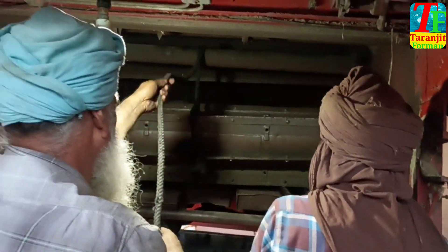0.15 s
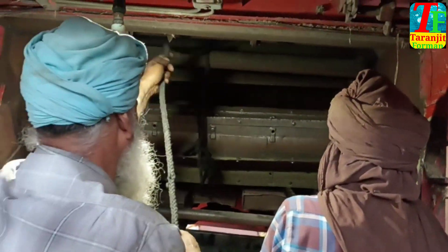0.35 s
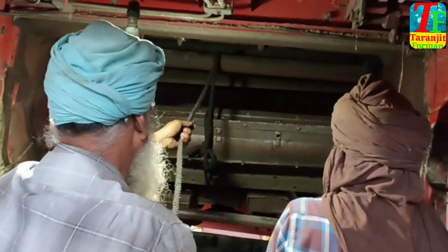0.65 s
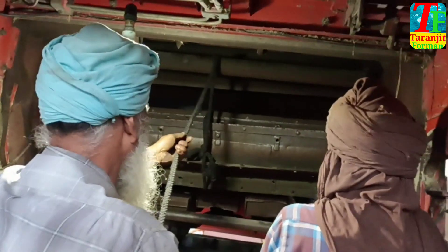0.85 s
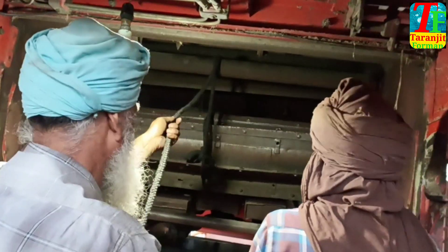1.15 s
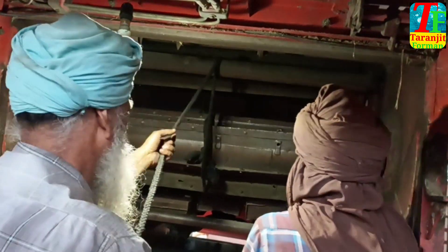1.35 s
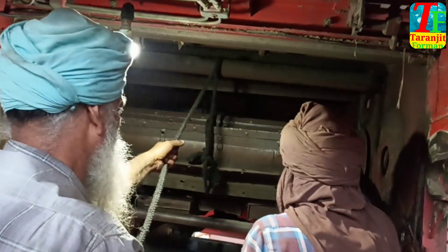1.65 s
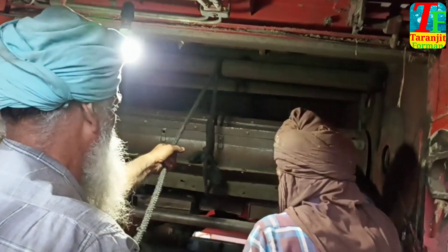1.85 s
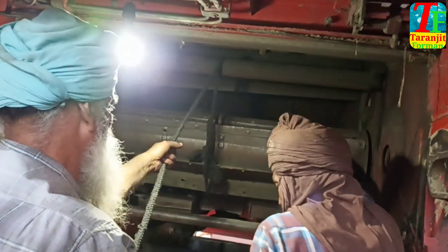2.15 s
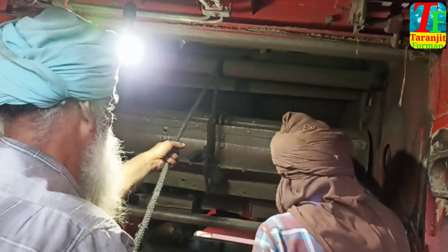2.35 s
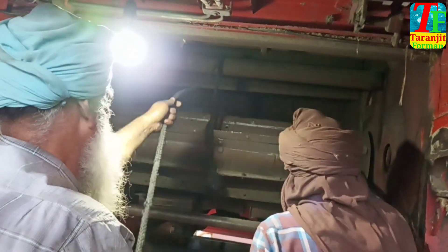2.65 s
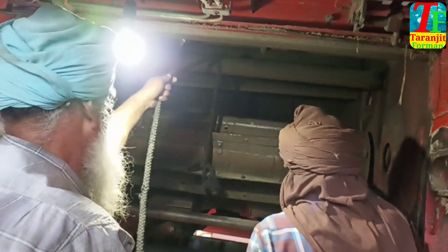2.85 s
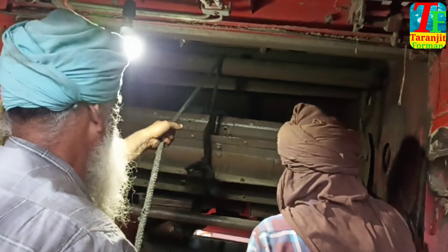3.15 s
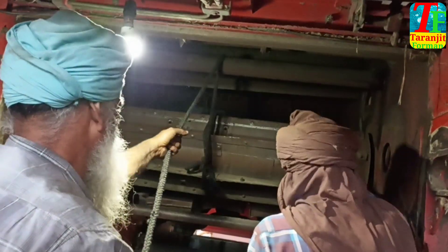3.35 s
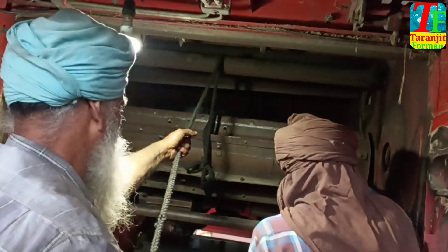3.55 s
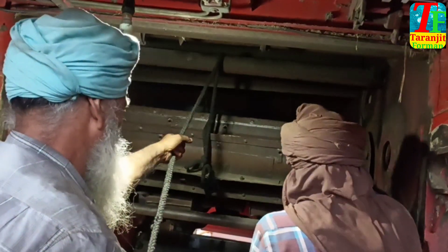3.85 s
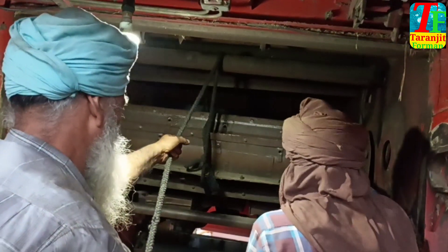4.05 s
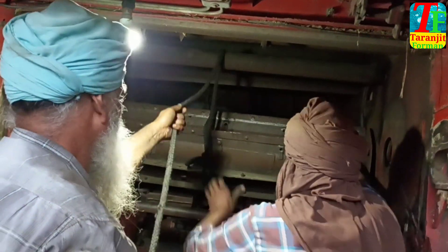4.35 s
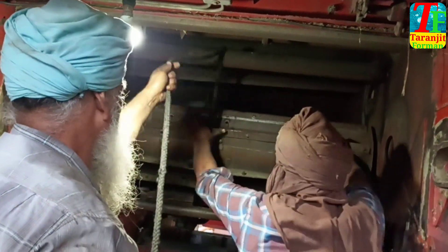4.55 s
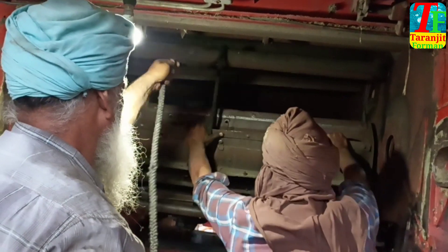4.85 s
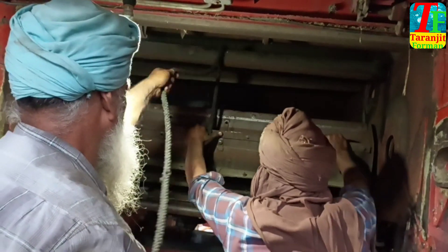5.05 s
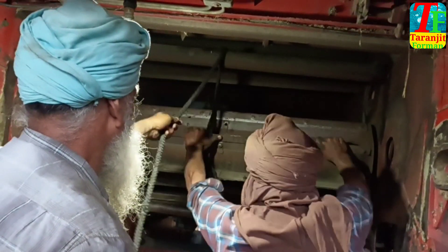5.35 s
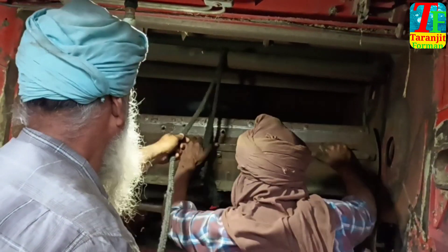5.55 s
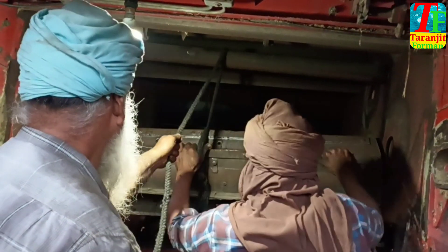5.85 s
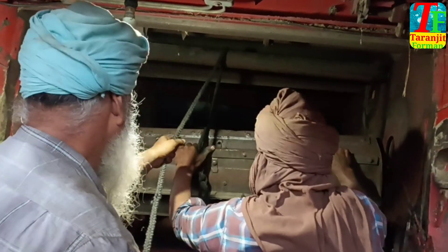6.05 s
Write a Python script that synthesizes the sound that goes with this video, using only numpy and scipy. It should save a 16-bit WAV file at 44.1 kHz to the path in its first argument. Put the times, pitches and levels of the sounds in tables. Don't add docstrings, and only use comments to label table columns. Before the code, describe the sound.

Inside a sheet-metal housing in a quiet workshop, faint ticks and a tiny far bird chirp precede a rough steel squeal with strap scraping. After a lull come a rattling double knock and a smaller clank, then a shriek running into the hardest knock. Finally a loud shriek, thud and bright jangle seat the drum, booming on. Close stereo microphone, panels ringing.

```python
import sys
import numpy as np
from scipy import signal
from scipy.fft import rfft, irfft, next_fast_len
from scipy.io import wavfile
from scipy.ndimage import uniform_filter1d

SR = 44100
rng = np.random.default_rng(int(sys.argv[2]) if len(sys.argv) > 2 else 0)


def put_to_file(sound):
    columns = np.atleast_2d(sound).T
    safe = np.clip(columns, -1, 1)
    whole_steps = np.round(safe * 32767)
    wavfile.write(sys.argv[1], SR, whole_steps.astype(np.int16))


def volts_from_decibels(level):
    exponent = np.asarray(level, float) / 20
    return 10 ** exponent


N = 272823
RIGHT_LAG_SAMPLES = 4

# f/Hz, correlation
LIKENESS = [(60, 0.93), (130, 0.98), (290, 0.92), (640, 0.67), (1410, 0.077), (3100, 0.034), (6820, 0.034),
            (15000, 0.01)]
# f/Hz, t60/s
PANEL_T60 = [(80, 3.4), (300, 1.11), (560, 1.08), (850, 0.5), (1500, 0.74), (2200, 0.57), (3900, 0.59),
             (10000, 0.21)]


def evened(x):
    return x / np.sqrt(np.mean(x ** 2) + 1e-20)


def read(points, hz):
    f, value = np.transpose(points)
    return np.interp(np.log(hz + 1), np.log(f + 1), value)


def colour(x, points):
    length = x.shape[-1]
    size = next_fast_len(length)
    gain = volts_from_decibels(read(points, np.fft.rfftfreq(size, 1 / SR)))
    return irfft(rfft(x, size) * gain, size)[..., :length]


def pair(size):
    whole = next_fast_len(size)
    a, b = rfft(rng.standard_normal((2, whole)))
    same = np.clip(read(LIKENESS, np.fft.rfftfreq(whole, 1 / SR)), -1, 1)
    return irfft([a, same * a + np.sqrt(1 - same ** 2) * b], whole)[:, :size]


def add(mix, start_s, sound):
    part = mix[..., round(start_s * SR):][..., :sound.shape[-1]]
    part += sound[..., :part.shape[-1]]


def wander(size, span):
    once = uniform_filter1d(rng.standard_normal(size), span)
    return evened(uniform_filter1d(once, span))


def swell(t, start_s, rise_s, hold_s, db, fall_db_s):
    up = np.sin(np.pi / 2 * np.clip((t - start_s) / max(rise_s, .002), 0, 1)) ** 4
    falling_s = np.maximum(t - start_s - rise_s - hold_s, 0)
    return up * volts_from_decibels(2 * (db - fall_db_s * falling_s))


def squeal(start_s, hold_s, force_db, rate_hz, rough, tops, tilt_db_oct, fall_db_s):
    bite, bite_s = 0.0381, .012
    rise_s, dulling_db_s = 0.016, 50.5
    t = np.arange(0, min(hold_s + 48 / fall_db_s, .36), 1 / SR)
    rough = np.clip(rough, 0, 1)
    hz = rate_hz * (1 + bite * np.exp(-t / bite_s))
    waver = .055 * wander(16384, 45) + .03 * wander(16384, 300)
    turns = np.cumsum(hz * (1 + rough * waver[:len(t)])) / SR

    order = np.arange(1, int(15600 / hz.max()) + 1)[:, None]
    level_db = read(tops, order * rate_hz) - read(tops, rate_hz)
    level = volts_from_decibels(level_db + (tilt_db_oct - dulling_db_s * t) * np.log2(order))
    phase = 0.29 * rng.random((64, 1))[:len(order)]
    slips = (level * np.cos(2 * np.pi * (order * turns + phase))).sum(0)
    slips = slips / np.sqrt((level ** 2).sum(0) / 2)

    chatter = volts_from_decibels(3 * rough * wander(16384, 70)[:len(t)])
    force = np.sqrt(swell(t, 0, rise_s, hold_s, force_db, fall_db_s))
    return start_s, force * slips * chatter


def slipping():
    # start t/s, hold t/s, force level/dB, slip rate f/Hz, roughness 0-1
    squeal_rows = [
        (2.161, 0.053, -19.5, 789, 0.99),
        (2.224, 0.057, -20, 834.3, 1.02),
        (2.158, 0.029, -19, 435, 0.5),
        (2.2, 0.099, -27.5, 424.3, .45),
    ]
    opener = (2.053, 0.022, -11, 780, 0.2)
    closer = (2.378, .045, -16.5, 419, .27)
    moan_rows = [(2.03, 0.008, -31, 880, 0.6), (2.33, 0.043, -30.5, 880, 0.55),
                 (2.098, 0.012, -24, 779.5, 0.35), (5.588, 0.024, -34, 932, 0.5),
                 (2.43, 0.015, -18, 403, 0.7), (2.48, 0.042, -20, 410, 0.6), (2.56, 0.019, -29, 420, 0.8),
                 (2.6, 0.0361, -47, 490, 0.56), (5.369, 0.015, -43, 3805, 0.22),
                 (4.77, 0.03, -26.5, 3720, .75), (4.815, 0.02, -27, 3690, 0.8),
                 (4.86, 0.01, -34, 3660, 0.7), (2.392, 0.04, -25.5, 1252, 0.25)]
    shriek_rows = [
        (4.728, 0.018, -20, 3700, 0.5),
        (5.592, 0.012, -18, 2960, 0.6),
        (5.612, 0.013, -12.5, 2780, .7),
        (5.635, 0.01, -18, 2720, 0.75),
        (5.615, .022, -19, 3130, .65),
    ]
    # f/Hz, level/dB
    squeal_tops = [(210, -46), (350, -7), (749, 2.5), (1280, 1.5), (1660, -7.5), (2580, -10.5), (3070, -7),
                   (4090, -10.5), (4950, -14), (7360, -19.5), (9940, -23), (12600, -21.5), (15500, -37)]
    opener_tops = [(780, 0), (1560, -9), (2340, -13), (3120, -12), (3900, -13), (4700, -21), (7400, -24),
                   (12600, -25), (15500, -40)]
    closer_tops = [(420, -10), (840, -8), (1260, -3), (1680, -14), (2100, -13), (2950, -22), (3800, -19),
                   (4700, -23), (10000, -28), (12600, -27), (15500, -43)]
    shriek_tops = [(2700, 0.5), (3800, 0), (5600, -4.5), (7400, -14.5), (8400, -17), (11200, -11),
                   (13500, -20), (14900, -15), (15600, -27)]
    # rows, envelope, tilt dB/octave, fall dB/s
    voices = [(squeal_rows, squeal_tops, 4, 340), ([opener], opener_tops, 4, 340),
              ([closer], closer_tops, 4, 340), (moan_rows, squeal_tops, -11, 227.5),
              (shriek_rows, shriek_tops, 0, 382)]
    out = np.zeros(N)
    for rows, tops, tilt_db_oct, fall_db_s in voices:
        for row in rows:
            add(out, *squeal(*row, tops, tilt_db_oct, fall_db_s))
    return out


def rubbing():
    # start t/s, rise t/s, hold t/s, force level/dB, body minus hiss level/dB
    strokes = [(-.02, 0.045, 0.011, -41.5, 9), (0.54, .035, 0.092, -57.5, 15.5),
               (0.732, 0.039, 0.0032, -45.5, 13.5), (1.089, 0.08, .27, -65.5, 9),
               (1.958, 0.0091, .003, -53.5, 7.5), (2.05, 0.027, 0.005, -34.5, 16.5),
               (2.157, .02, .02, -28, 7.5), (2.195, 0.042, 0.012, -23, 10.5),
               (2.379, 0.033, 0.036, -30, 10.5), (2.605, 0.013, .02, -52.5, 24),
               (2.811, .025, 0.0057, -58.5, 19), (3.177, 0.091, 0.018, -64.5, 21.5),
               (4.227, 0.096, 0.026, -50, 13), (4.7, 0.049, .005, -38.5, 8),
               (4.801, 0.013, 0.002, -26.5, 9.5), (4.889, .012, .003, -31, -12.5),
               (5.3, 0.13, 0.42, -64.5, 18.5), (5.592, 0.038, 0.045, -33, 7), (5.67, .02, .06, -47, 8),
               (5.748, 0.0049, 0.0033, -26.5, -9), (5.794, 0.026, 0.11, -45, 18.5),
               (5.878, 0.037, 0.23, -59, 21.5), (6.172, 0.022, .03, -52, 18)]
    # f/Hz, level/dB per Hz
    hiss_colour = [(2500, -47.5), (4200, -4), (6000, 2.5), (8000, -7.5), (11500, -2), (14500, -8),
                   (15400, -9), (16000, -59.5)]
    body_colour = [(300, -48.5), (800, -12), (1300, 2), (2100, 6), (2800, 3), (4000, -2), (6000, -33.5)]
    hiss_fall_db_s, body_fall_db_s = 331, 194
    creep_db, creep_fall_db_s = -21, 67.5
    grit = pair(N) * volts_from_decibels(1.3 * wander(N, 40))
    hiss = evened(colour(grit, hiss_colour))
    body = evened(colour(grit, body_colour))
    t = np.arange(0, N + 16, 16) / SR
    hiss_power, body_power = 0, 0
    for s, rise_s, hold_s, db, body_db in strokes:
        creep = swell(t, s, rise_s, hold_s, db + creep_db, creep_fall_db_s)
        hiss_power = hiss_power + swell(t, s, rise_s, hold_s, db, hiss_fall_db_s) + creep
        body_power = body_power + swell(t, s, rise_s, hold_s, db + body_db, body_fall_db_s) + volts_from_decibels(25.5) * creep
    every = np.arange(N) / SR
    hissing = np.interp(every, t, np.sqrt(hiss_power)) * hiss
    humming = np.interp(every, t, np.sqrt(body_power)) * body
    return volts_from_decibels(-3.5) * (hissing + volts_from_decibels(-5.5) * humming)


def knocks():
    # t/s, strength level/dB, bass level/dB, treble level/dB, share into long ring level/dB
    knock_rows = [
        (0.553, -40.5, 2.5, -24, 2),
        (1.965, -39.5, -17.5, -19, 2),
        (2.611, -28, -9, -8, 1.5),
        (3.305, -17, -2.5, -16, -3),
        (3.289, -18, -1.5, -8.5, -5.5),
        (4.897, -6.5, -3, -21, -5.5),
        (5.66, -17.5, -7, -29, 2.5),
        (5.95, -22, -23, -20, -14),
    ]
    tap_rows = [(0.755, -47.5, -15.5, -4, -13.5), (2.032, -33.5, -5.5, -21, 4.5), (2.836, -36, 7, -18, -10),
                (3.239, -11, -26, -22.5, -6.5), (3.775, -19, -25, -29, -6), (4.719, -42.5, -5, -3, 14),
                (4.811, -20.5, -1.5, -19, -3), (5.535, -47, -8, -11, 12.5), (5.754, -13, -5.5, -10.5, -4),
                (6.181, -44, -7, -20, -0.5)]
    tick_rows = [(.305, -32, -12, -16, -20), (1.777, -68.5, -20.5, 17, -29), (5.505, -50, -4, 9, -18),
                 (4.812, -17, -15, -24, -20), (4.826, -11, -15, -24, -20), (4.834, -17, -15, -26, -20),
                 (4.843, -16, -15, -24, -19), (3.222, -34, -20, -30, -20), (3.252, -14.5, -20, -25, -20),
                 (3.303, -11.5, -10, -13, -20), (3.325, -14, -12, -20, -23), (3.367, -20.5, -5, -25, -20),
                 (4.909, -8, -15, -25, -20), (5.534, -29, -9, -15, -20), (.758, -36, -20, -8, -20),
                 (.552, -36, -20, -25, -20), (3.788, -20, -20, -28, -20), (3.8, -17, -12, -28, -20),
                 (2.055, -26, -20, -10, -20)]
    contacts = [(knock_rows, 58.8), (tap_rows, 48), (tick_rows, 6.7)]
    bass_colour = [(50, -53.5), (130, 13.0), (450, 18.5), (900, -35.5), (2000, -102)]
    middle_colour = [(150, -60.0), (300, -22), (600, 4.5), (1150, 5.0), (1600, -1), (2300, -3),
                     (3200, -10.0), (4500, -33.5), (7000, -40.5), (12000, -72.0)]
    treble_colour = [(1500, -44.5), (4500, 7.5), (9000, -10.5), (13000, -9.0), (15300, -22.5), (16000, -70)]
    near, far = np.zeros((2, N)), np.zeros(N)
    t = np.arange(8192) / SR
    slow = 1 - np.exp(-t / 0.016)
    fade = np.cos(np.pi / 2 * (t / t[-1]) ** 3)
    for rows, length_ms in contacts:
        shape = np.exp(-1000 * t / length_ms) * (1 - np.exp(-t / 0.0016)) * fade
        for s, db, bass_db, treble_db, ring_db in rows:
            grit = pair(len(t))
            bass = volts_from_decibels(bass_db) * evened(colour(grit, bass_colour)) * slow
            middle = evened(colour(grit, middle_colour)) * shape ** 0.49
            treble = volts_from_decibels(treble_db) * evened(colour(grit, treble_colour)) * shape ** 1.4
            blow = volts_from_decibels(db - 3.5) * shape * (bass + middle + treble)
            add(near, s - .002, blow)
            add(far, s, volts_from_decibels(ring_db) * blow[0])
    return near, far


def jangle():
    # t/s, level/dB, decay t/ms
    burst_row = (5.752, -14, 16)
    # f/Hz, level/dB per Hz
    link_colour = [(9500, -26), (11700, -4), (12600, -2), (13500, -13), (14700, 1), (15300, -2),
                   (15700, -34)]
    s, db, decay_ms = burst_row
    out, t = np.zeros((2, N)), np.arange(8192) / SR
    burst = evened(colour(pair(len(t)), link_colour))
    add(out, s, volts_from_decibels(db) * burst * (1 - np.exp(-t / 0.002)) * np.exp(-1000 * t / decay_ms))
    return out


def thuds():
    # t/s, level/dB, f/Hz, decay t/ms
    thud_rows = [(5.682, 2.5, 262, 6.3), (5.687, -9.5, 142, 10), (5.6934, -4, 201, 8.3),
                 (.79, -36.5, 171, 14), (5.754, -11.5, 650, 25), (5.825, -14.5, 231.6, 25.5),
                 (5.87, -14.5, 255.7, 22), (5.905, -15, 225.5, 30), (6.02, -13.5, 135.4, 30),
                 (.624, -30, 220, 8), (.657, -31, 190, 12), (3.857, -20, 180, 10)]
    out, t = np.zeros(N), np.arange(5000) / SR
    for s, db, hz, decay_ms in thud_rows:
        add(out, s, volts_from_decibels(db) * np.sin(2 * np.pi * hz * t) * np.exp(-1000 * t / decay_ms))
    return out


def resonate(stereo, start_s, end_s, modes, lift_db_oct=0):
    start, end = round(start_s * SR), round(end_s * SR)
    size = next_fast_len(end - start + SR // 4)
    f = np.fft.rfftfreq(size, 1 / SR)
    gain = 0
    for hz, width_hz, db in modes:
        lift_db = lift_db_oct * np.log2(hz / modes[0][0])
        gain = gain + volts_from_decibels(db + lift_db) / (1 + 2j * (f - hz) / max(width_hz, 5))
    out = np.zeros((2, N))
    add(out, start_s, irfft(rfft(stereo[:, start:end], size) * gain, size))
    return out


def drum_shell(rubs, squeals):
    # f/Hz, width f/Hz, level/dB
    shell_modes = [(686, 88, -5), (790, 90, -4), (1250, 28, 3), (1697, 110, 1.5), (2120, 25, 0),
                   (2325, 80, 2.5), (2525, 22, -3), (3085, 85, -9), (3400, 40, -8.5), (3810, 70, -3),
                   (4220, 60, 3.5), (4580, 31, 0), (4765, 33, -2.5), (5510, 55, -6)]
    return resonate(volts_from_decibels(8.5) * rubs + volts_from_decibels(5) * squeals, 2.15, 2.75, shell_modes)


def parts(touch):
    # f/Hz, width f/Hz, level/dB
    frame = [(422, 220, -1.5), (716, 36, -1), (1178, 52, -5), (1660, 16, -11), (1830, 50, -9.5),
             (2090, 39, -7.5), (2330, 36, -4.5), (2933, 54, -15), (3290, 34, -14), (3500, 23, -19),
             (4090, 48, -22), (4370, 44, -19)]
    bracket = [(1500, 96, 0), (1950, 29, -5), (2320, 140, -11), (2760, 24, -6), (2900, 42, -3),
               (4120, 26, -10), (4360, 64, -12), (4740, 28, -10)]
    rail = [(2075, 41, -1.5), (2300, 72, -6), (2600, 35, -3), (2720, 27, 1), (2940, 20, -7), (3360, 29, -6),
            (4100, 37, -12)]
    seat = [(635, 32, -2), (766, 26, -1.5), (1016, 17, -3), (1186, 42, 1), (1640, 27, -10), (1850, 39, -10),
            (2100, 21, -10), (2350, 15, -11), (3180, 24, -21), (3980, 39, -25)]
    links = [(11700, 25, -8), (12100, 34, -9), (12740, 45, -7), (13500, 61, -10), (13900, 27, -12),
             (14300, 24, -10), (14600, 45, 0)]
    hatch = [(603, 30, -2), (738, 45, -2), (996, 25, -2), (1250, 30, -2), (1620, 65, -3), (1750, 25, -3.5),
             (2200, 60, -8), (2540, 44, -9), (3200, 65, -20), (3520, 20, -26)]
    bodies = [(3.2, 3.5, frame, 3), (.74, .83, bracket, 4), (4.2, 4.45, rail, 6.5),
              (4.885, 5.1, seat, 2), (5.745, 5.85, links, 6), (3.76, 3.95, hatch, 2.5)]
    return sum(volts_from_decibels(db) * resonate(touch, start_s, end_s, modes, lift_db_oct=5.5)
               for start_s, end_s, modes, db in bodies)


def lean(stereo, share):
    # f/Hz, level/dB
    side_points = [(60, 0), (110, 0), (200, -0.5), (380, 1), (700, 0), (1290, -3.5), (2380, -4.5),
                   (4400, 0.5), (8120, 7), (15000, 9)]
    hz, db = np.transpose(side_points)
    return np.array([colour(x, np.c_[hz, side * share * db / 2]) for x, side in zip(stereo, (1, -1))])


def housing(t60, length_s):
    hz, t, z = signal.stft(pair(round(length_s * SR)), SR, nperseg=256)
    z = z * volts_from_decibels(-60 * t / np.maximum(read(t60, hz), .02)[:, None])
    tail = signal.istft(z, SR, nperseg=256)[1]
    return tail / np.sqrt((tail ** 2).sum() / 2)


def panel_modes():
    place, size, turn = rng.random((140, 3)).T
    hz, t = 170 * 28 ** place, np.arange(SR // 2) / SR
    t60_s = read(PANEL_T60, hz)
    swings = np.exp(np.outer(2j * np.pi * hz - np.log(1000) / (.85 * t60_s), t))
    apart = np.arccos(np.clip(read(LIKENESS, hz), -1, 1)) * np.sign(turn - .5)
    phases = np.exp(1j * np.outer([-.5, .5], apart))
    tail = (volts_from_decibels(13 * size) * np.sqrt(hz / t60_s) * phases @ swings).imag
    return np.pad(tail / np.sqrt((tail ** 2).sum() / 2), [(0, 0), (0, 2 * SR)])


def heard(x, response):
    return signal.fftconvolve(x[None], response, axes=1)[:, :N]


def long_ring(feed):
    panels = housing(PANEL_T60, length_s=1.3)
    panels = panels + volts_from_decibels(-9) * panel_modes()[:, :panels.shape[1]]
    return colour(heard(feed, panels), [(100, 2.0), (900, 1.5), (1550, -5.5), (2300, 1), (3000, -5.5),
                                        (4000, -6.5), (12000, -1.5)])


def rocking():
    # start t/s, rise t/s, hold t/s, level/dB, fall dB/s
    boom_rows = [(0.226, 0.026, 0.21, -43.5, 290), (0.547, 0.1, 0.026, -40.5, 92),
                 (.75, 0.056, 0.29, -50, 190), (1.148, 0.1, .6, -62, 103), (1.99, 0.12, 0.21, -36.5, 88),
                 (2.52, 0.064, .03, -37.5, 146), (2.767, 0.084, .19, -42.5, 150),
                 (3.18, 0.1, 0.21, -31.5, 151), (3.58, .06, .15, -44, 152), (3.83, 0.054, 0.1, -34, 36),
                 (4.722, 0.15, .11, -34, 144), (4.948, 0.048, 0.19, -24, 303), (5.298, 0.029, .08, -34, 49),
                 (5.494, 0.02, 0.066, -41, 108), (5.781, 0.044, 0.22, -25, 144),
                 (6.01, 0.041, .19, -24, 52)]
    # start t/s, rise t/s, hold t/s, level/dB
    jolt_rows = [(-.3, .11, 6.6, -55), (0.19, 0.024, 0.048, -48), (0.547, 0.033, 0.018, -36.5),
                 (1.964, 0.14, 0.46, -28.5), (2.386, 0.057, 0.01, -33.5), (3.206, 0.078, 0.032, -18.5),
                 (3.754, 0.051, .01, -23), (4.716, 0.086, 0.055, -19.5), (4.875, 0.074, 0.041, -14.5),
                 (5.284, 0.18, 0.21, -31.5), (5.558, 0.12, 0.076, -13.5), (5.81, 0.058, 0.12, -13)]
    # f/Hz, level/dB per Hz
    rumble_colour = [(24, -48.5), (45, -24), (80, -15), (108, 3.5), (151, -3), (264, -0.5), (362, -1),
                     (401, -2), (451, -10), (685, -10.5), (900, -19), (1170, -38.5), (1980, -120)]
    boom_hz, boom_width_hz, panel_fall_db_s = 101.2, 46.4, 49.5
    t, slow = np.arange(N) / SR, np.arange(0, N + 64, 64) / SR
    turns = boom_hz * t + 0.13 * wander(N, round(SR / boom_width_hz))
    boom = np.sqrt(2) * np.cos(2 * np.pi * turns)
    rumble = evened(colour(pair(N), rumble_colour))
    swing = np.sqrt(sum(swell(slow, *row) for row in boom_rows))
    shake = np.sqrt(sum(swell(slow, *row, panel_fall_db_s) for row in jolt_rows))
    return np.interp(t, slow, swing) * boom + volts_from_decibels(-5.5) * np.interp(t, slow, shake) * rumble


def chimes():
    # (f/Hz, level/dB, t60/s)
    loose_parts = [
        (-37.5, 4.5, [(1980, -22, 0.36), (2130, -1, .8), (2915, -7, 0.53), (3380, -7, 0.63), (4366, -9, 0.43), (5469, -24, 0.92), (6024, -27, 0.65), (7241, -24, 0.81), (7806, -29, 0.6), (8400, -23, 0.84), (9329, -24, 0.67), (10440, -19, 0.79), (12310, -20, 0.6), (13860, -16, .7)]),
        (-50.5, 1, [(540, -1.5, 0.57), (696, -2, 0.7), (775, 5.5, 0.23), (1210, -5, 0.63), (1276, -4.5, 0.52)]),
        (-63.5, 5, [(1640, -2.5, 2.8), (2040, -21, 5.0), (3150, -5, 0.98)]),
        (-52, 0.53, [(4400, -0.5, 0.47)]),
        (-18, 5.8, [(12180, -21, 0.3), (13870, -25.5, .2), (14560, -12, 0.36), (14800, -13.5, .15)]),
        (-70, .3, [(9135, -6, 0.1025), (12180, 1, 0.11), (14560, -16, .3)]),
        (-47, .5, [(2170, -6, .3), (2915, 0, .3), (3380, 0, .3), (4366, -7, 0.28)]),
    ]
    strike_times = [.768, 1.74, 1.55, 3.33, 5.756, 4.9, .712]
    out, t = np.zeros(N), np.arange(round(.36 * SR)) / SR
    held = (1 - np.exp(-t / 0.035)) * np.clip((t[-1] - t) / 0.068, 0, 1)
    for s, (part_db, longest_s, modes) in zip(strike_times, loose_parts):
        tone = sum(volts_from_decibels(db - 60 * t / min(t60_s, longest_s)) * np.sin(2 * np.pi * hz * t)
                   for hz, db, t60_s in modes)
        add(out, s, volts_from_decibels(part_db) * tone * held)
    return out


def bird():
    # t/s, level/dB, from f/Hz, to f/Hz, length t/s
    chirp_rows = [
        (1.642, -67, 4400, 3220, 0.043),
        (1.883, -65, 4120, 3200, 0.083),
    ]
    out = np.zeros(N)
    for s, db, from_hz, to_hz, length_s in chirp_rows:
        hz = np.linspace(from_hz, to_hz, round(length_s * SR))
        add(out, s, volts_from_decibels(db) * np.sin(2 * np.pi * np.cumsum(hz) / SR) * np.hanning(len(hz)))
    return out


def workshop():
    # f/Hz, level/dB per Hz
    hum_colour = [(18, -79), (30, -34.5), (86, 7), (183, 2.5), (238, 1), (294, -21), (318, -8.5),
                  (795, -11), (907, -13.5), (1180, -13), (1790, -11), (1990, -10), (5680, -31.5),
                  (11800, -33.5), (15800, -30)]
    return volts_from_decibels(-54.5) * evened(colour(pair(N), hum_colour)) * volts_from_decibels(0.3 * wander(N, 1500))


def scene():
    near, far = knocks()
    slips = slipping()
    rubs = rubbing()
    scatter = heard(slips, housing([(100, 0.084), (10000, 0.071)], length_s=.12))
    squeals = volts_from_decibels(-6.5) * np.array([slips, np.roll(slips, -2)]) + volts_from_decibels(-11.5) * scatter
    touch = near + jangle() + rubs
    direct = lean(touch + parts(touch) + squeals + drum_shell(rubs, squeals), share=1.23)
    ring = long_ring(far + volts_from_decibels(-13.5) * slips + volts_from_decibels(-8.5) * rubs[0])
    small = chimes() + bird()
    aside = np.array([small, 0.72 * np.roll(small, 1 - RIGHT_LAG_SAMPLES)])
    return direct + ring + thuds() + aside + rocking() + workshop()


def roll_off(x):
    return signal.sosfilt(signal.butter(12, 15830, fs=SR, output="sos"), x)


def record(dry):
    late = [dry[0], np.roll(dry[1], RIGHT_LAG_SAMPLES)]
    thinned = signal.sosfilt(signal.butter(2, 55, "high", fs=SR, output="sos"), late)
    overloaded = np.tanh(thinned * 1.157) / 1.146
    edge = signal.ellip(10, .5, 50, 15650, fs=SR, output="sos")
    return roll_off(signal.sosfilt(edge, overloaded))


dry = scene()
out = record(dry)
put_to_file(out)
```